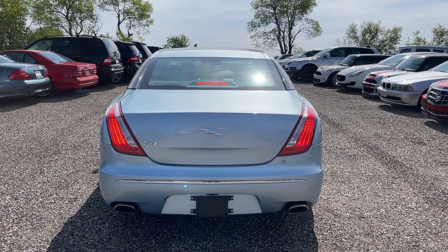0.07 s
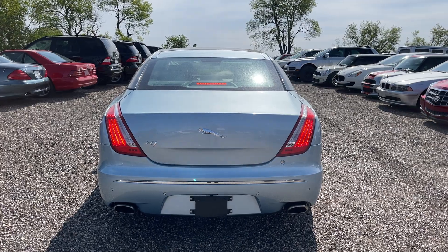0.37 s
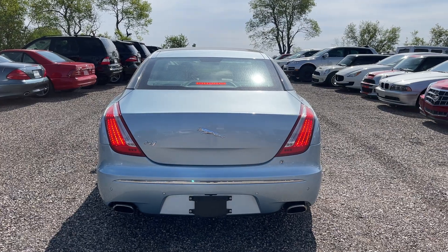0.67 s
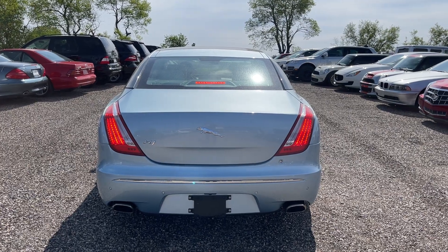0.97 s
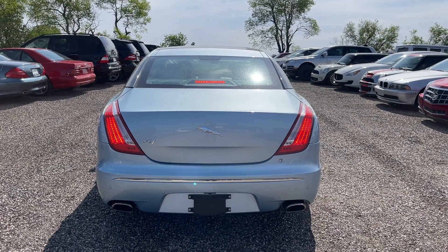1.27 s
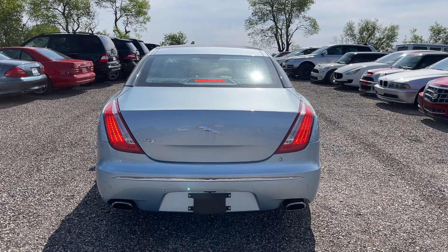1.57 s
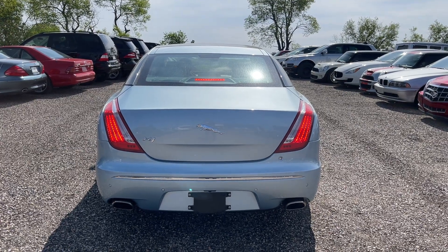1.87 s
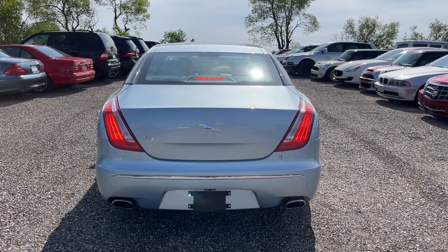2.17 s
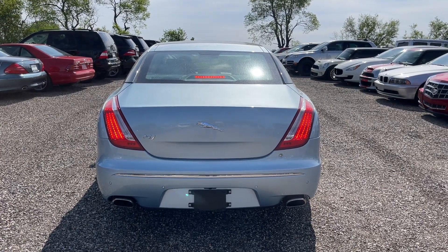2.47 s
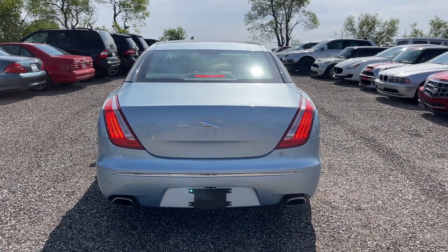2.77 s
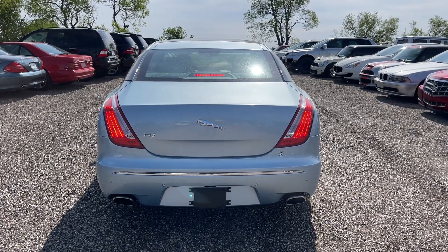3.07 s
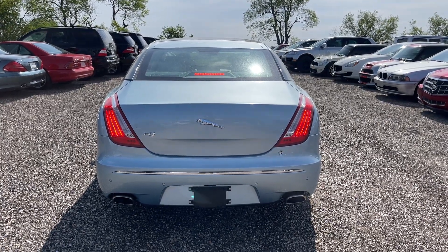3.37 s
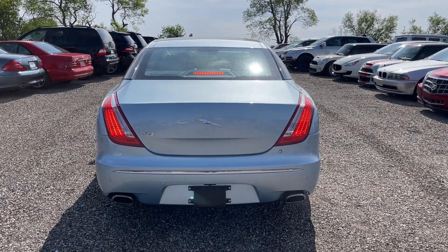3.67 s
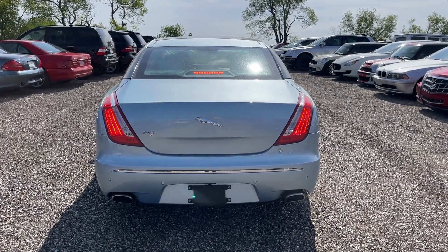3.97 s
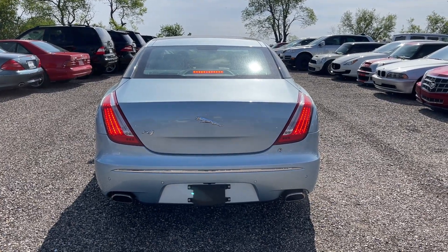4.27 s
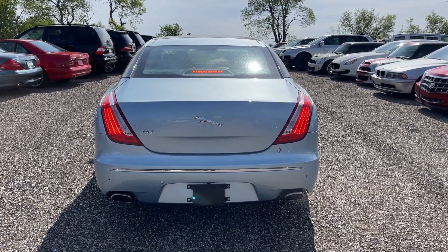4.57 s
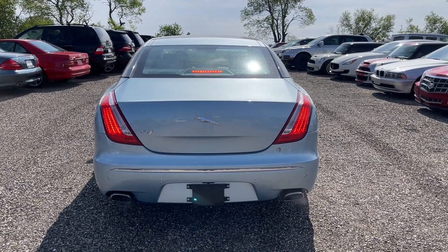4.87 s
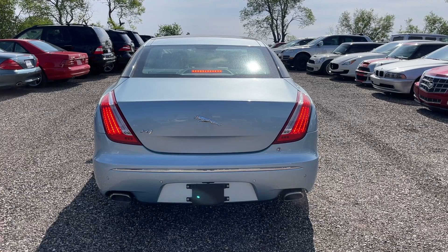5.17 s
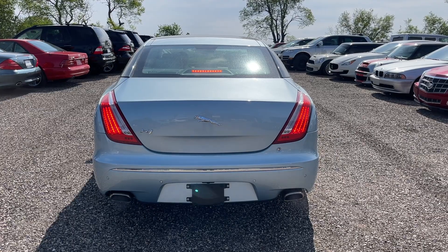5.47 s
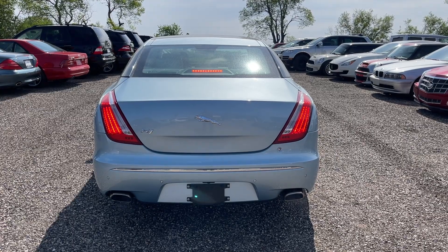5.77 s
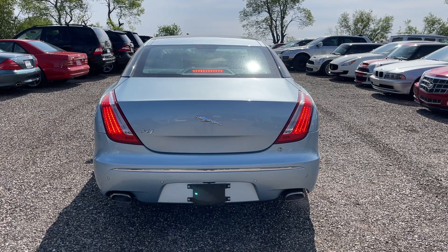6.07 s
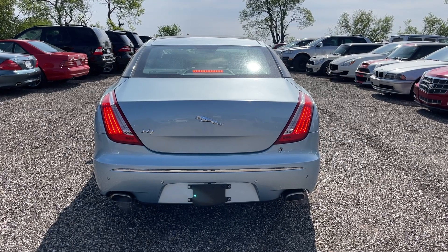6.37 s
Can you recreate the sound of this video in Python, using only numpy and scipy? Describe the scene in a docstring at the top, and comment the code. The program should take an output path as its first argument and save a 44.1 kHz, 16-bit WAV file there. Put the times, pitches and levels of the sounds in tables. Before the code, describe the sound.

Small birds whistle and trill above the low drone of a running engine and a faint traffic rumble in a parking lot. Heard from a few metres behind, a car's starter clacks in and cranks briefly. The V8 catches with sharp pops, thumps and a hiss, revs up, then eases down to a quick, throaty idle with faint ticks. Short echoes scatter off the parked cars.

```python
"""An engine drones and small birds sing on a gravel lot; then, a few metres away, a V8 saloon starts cold.
Heard from behind its tailpipes, the starter clacks in and cranks, the first charges bark and pop,
and the revs flare and settle to a fast, ticking idle. Two uneven banks pulse into the pipes to make
the burble, with a puff of gas at each firing. The rows of parked cars scatter the sound."""
import sys
import numpy as np
from scipy import signal
from scipy.fft import rfft, irfft, next_fast_len
from scipy.io import wavfile
from scipy.ndimage import uniform_filter1d

SR = 44100
rng = np.random.default_rng(int(sys.argv[2]) if len(sys.argv) > 2 else 0)


def generate_wav(signal):
    """Clip the signal to [-1, 1] and save it as 16-bit WAV at the path in sys.argv[1]."""
    frames = np.transpose(np.atleast_2d(signal))
    scaled = np.clip(frames, -1, 1) * 32767
    pcm = np.round(scaled).astype(np.int16)
    wavfile.write(sys.argv[1], SR, pcm)


N = 287091
T = np.arange(N) / SR
FIRES_S = 3.235  # the V8 catches

# tailpipe resonances: centre_hz, width_hz, lift_db
TAILPIPE = [(620, 27, 7.5), (1116, 53, 6.5), (2355, 50, 6), (3800, 80, 5), (4810, 110, 4)]
# bright colour of the hiss and the ticks: freq_hz, gain_db
HISS_EQ = [(1500, -7.5), (3000, 3.5), (3900, 1), (5000, -1), (6500, -5), (7500, -4), (9000, -1),
           (10200, -19), (11200, -6.5), (12500, -50)]


def engine(scatter_db=2):
    """Eight uneven cylinders fire in turn, driving the exhaust, the gas and the ringing metal."""
    # the revs flare, dip, recover and settle: time_s, firing_hz
    revs = [(3.24, 38.6), (3.5, 126.9), (3.72, 133.25), (4.1, 106.25), (4.48, 109.4), (5.05, 98.4),
            (5.9, 90.9), (6.5, 90.6)]
    # how hard the engine works, as the level of its burble: time_s, level_db
    effort = [(3.25, -28.5), (3.35, -28.5), (3.47, -26), (3.7, -34.5), (3.9, -36.5), (3.98, -43.5),
              (4.2, -37.5), (4.42, -30.5), (4.97, -30), (5.55, -32.5), (5.95, -36), (6.5, -32.5)]
    # strength of each cylinder, in firing order: gain_db
    cylinder_db = [-2.5, 0.95, 0, 1.5, -0.5, -0.24, 0.052, -2.6]
    rate, effort_db = curve(revs), curve(effort)
    running = np.clip((T - FIRES_S) / .02, 0, 1)
    phase = np.cumsum(rate * (running > 0)) / SR  # counts firings
    firing = phase.astype(int)
    charge_luck, tick_luck = rng.standard_normal((N // 100, 2))[firing].T
    strength = unit(undb(np.array(cylinder_db)[firing % 8] + scatter_db * charge_luck))
    pulses = bank_pulses(firing, strength * np.sqrt(SR / rate))
    puffs = unit(strength * (1 + 2 * np.exp(-3 * (phase % 1))))
    # gas and metal grow with effort and flutter once per engine cycle
    rush = undb(-40.5 + .35 * (effort_db + 30) + 1.5 * np.cos(2 * np.pi * phase / 8))
    metal = ringing_metal(pulses, rate, rush)
    exhaust = undb(effort_db) * (burble(pulses, puffs, rate) + silencer(phase, rate, strength))
    gas = rushing_gas(puffs, rate, rush)
    return running * (exhaust + metal + gas + ticking_hiss(phase, tick_luck))


def bank_pulses(firing, strength, lag_s=.00242):
    """One pressure pulse per firing; one bank has the longer pipe, so its pulses come late."""
    # the bank of each cylinder, in firing order: 0 short pipe, 1 long pipe
    bank = [0, 1, 1, 0, 1, 0, 0, 1]
    pulses = np.diff(firing, prepend=0) * strength
    late = pulses * np.array(bank)[firing % 8]
    return pulses - late + np.interp(T - lag_s, T, late)


def burble(pulses, puffs, rate, pulse_db=1, turbulence_db=-6.5):
    """Pulses and turbulence resonate in the pipe; uneven burning blurs the upper harmonics."""
    # cold charges burn less evenly as the revs sink: firing_hz, timing_spread_s
    burn_spread = [(95, .0005), (108, .00032)]
    # deep colour of the exhaust pipe: freq_hz, gain_db
    pipe_eq = [(35, -27.5), (60, 4), (105, 6), (150, 2), (180, 0), (220, 5), (285, -2.5), (325, -11),
               (410, -9.5), (520, -17), (620, -31.5), (720, -28.5), (1100, -25.5), (1600, -57)]
    # its standing waves: centre_hz, width_hz, lift_db
    standing_waves = [(149, 10, 5), (418, 23, 7)]
    jitter_s = np.interp(rate, *np.transpose(burn_spread)) * walk(90)
    blurred = undb(pulse_db) * np.interp(T + jitter_s, T, pulses)
    return colour(blurred + undb(turbulence_db) * noise() * puffs, pipe_eq, standing_waves)


def silencer(phase, rate, strength, resonance_hz=96.1, width_hz=24):
    """The firing tone booms at the silencer's resonance; its octave rings only at high revs."""
    boom = undb(-9) + undb(12) / (1 + (2 * (rate - resonance_hz) / width_hz) ** 4)
    tone = boom * undb(.8 * walk(20)) * np.sin(2 * np.pi * phase)
    octave = undb(-1 + 2 * walk(60)) * np.sin(4 * np.pi * phase + .36 * walk(70))
    high_revs = np.clip((rate - 98) / 7, 0, 1) * np.minimum(110 / rate, 1) ** 2
    return tone + strength * high_revs * octave


def rushing_gas(puffs, rate, rush, rasp_db=-48.5):
    """Gas puffs out of the tailpipes and rasps when it flows fast."""
    # hollow colour of the gas: freq_hz, gain_db
    gas_eq = [(90, -10.5), (230, -31.5), (340, 5.5), (580, 5.5), (700, -3.5), (815, 7), (950, -0.5),
              (1020, 4), (1270, -1), (1500, -9.5), (2000, -13), (2700, -14), (3200, -31), (5000, -50)]
    # colour of the rasp: freq_hz, gain_db
    rasp_eq = [(700, -7.5), (1400, 3.5), (2700, 3.5), (3300, -23), (6000, -42.5)]
    gas = colour(noise() * puffs, gas_eq, TAILPIPE) * undb(.5 + 1.4 * walk(13))
    rasp = colour(noise() * puffs, rasp_eq) * undb(rasp_db) * (rate / rate.max()) ** 3
    return rush * gas + rasp


def ringing_metal(pulses, rate, rush, swell_s=6.2, swell_db=-43):
    """Thin metal sings in sympathy when a harmonic of the firings passes one of its resonances."""
    # the metal's resonant bands: centre_hz, half_width_hz, gain_db
    modes = [(621, 19, -23), (1106, 18, -14), (1236, 43, -17.5)]
    low_revs = np.clip((120 - rate) / 12, 0, 1)
    drive = rush * low_revs * undb(2.8 * walk(24))
    metal = sum(undb(db) * band(pulses, hz, 2 * half_width) for hz, half_width, db in modes)
    # late in the idle the lowest ring swells
    lowest = np.sqrt(2) * np.sin(angle(modes[0][0] * (1 + .006 * walk(50))))
    return drive * metal + undb(swell_db) * np.exp(-((T - swell_s) / .12) ** 2) * lowest


def ticking_hiss(phase, tick_luck, idle_db=-56.5, surge_db=-50, surge_decay_s=.2):
    """Hiss surges as the engine fires, then relaxes; the fuel pump ticks on every second firing."""
    stroke = phase / 2
    cam_db = np.array([-4, -12.5, -3, -18])[stroke.astype(int) % 4] + 2 * tick_luck
    ticks = uniform_filter1d(2 * undb(cam_db) * np.exp(-(stroke % 1) / .38), SR // 250)
    hiss = colour(noise() * unit(np.hypot(1, ticks)), HISS_EQ, TAILPIPE)
    level = undb(idle_db) + undb(surge_db) * np.exp(-np.maximum(T - FIRES_S, 0) / surge_decay_s)
    return level * hiss * undb(.65 * walk(9.3))


def valve_ticks(decay_s=.0025):
    """A cold valve ticks out now and then."""
    # ticks: start_s, level_db
    ticks = [(4.766, -47), (4.955, -48), (5.085, -44), (5.407, -48), (5.5, -47), (5.622, -45)]
    return colour(noise() * bursts([(s, db, decay_s) for s, db in ticks], rise_s=.00025), HISS_EQ)


def barks(grit_db=3):
    """The first firings spit gritty noise through the cold pipes."""
    # spits: start_s, level_db, decay_s
    spits = [(3.237, -37, 0.017), (3.263, -40, 0.022), (3.283, -43, 0.007), (3.293, -32, 0.005),
             (3.301, -26.5, 0.005), (3.322, -39, 0.014), (3.338, -28.5, 0.0029), (3.363, -30, 0.0035),
             (3.376, -29, 0.0043), (3.402, -30, 0.0033), (3.42, -39, 0.003), (3.475, -35.5, 0.0049)]
    # their harsh colour: freq_hz, gain_db
    bark_eq = [(150, -14), (400, 1), (750, 3.5), (1350, 19), (1900, 3.5), (2800, 11.5), (3400, -4.5),
               (4800, 9.5), (7000, -1.5), (9300, 9.5), (10300, -8), (11300, 8.5), (12700, -12)]
    return colour(noise() * bursts(spits, rise_s=.0069) * undb(grit_db * walk(600)), bark_eq)


def pipe_pops(slap_db=21, puff_db=-3, decay_s=.0074):
    """Single charges pop as the engine catches, each a pressure pulse and a puff."""
    # charges: start_s, level_db
    charges = [(3.247, -35.5), (3.262, -35), (3.272, -30.5), (3.289, -28.5), (3.297, -29), (3.332, -26),
               (3.366, -30), (3.386, -27.5), (3.414, -28), (3.428, -26), (3.445, -32), (3.468, -24.5),
               (3.483, -27.5), (3.511, -36)]
    # boxy colour of a pop: freq_hz, gain_db
    pop_eq = [(150, 4), (250, 22), (350, 4), (480, 6), (650, 2.5), (850, 10.5), (1050, -4), (1400, -5.5),
              (1800, -13), (4000, -29.5)]
    pops = noise() * bursts([(s, db + puff_db, decay_s) for s, db in charges], rise_s=.0013)
    for s, db in charges:
        pops[int(s * SR)] += undb(db + slap_db)
    return colour(pops, pop_eq)


def exhaust_knocks(clank_decay_s=.0087, overtone_db=-8):
    """The fullest charges thump in the silencer and the hardest blows clank the exhaust."""
    # thumps: start_s, pitch_hz, level_db, decay_s
    thumps = [(3.288, 67.5, -3, 0.0078), (3.304, 54, -17, 0.053), (3.433, 95, -11, 0.0081)]
    # clanks: start_s, pitch_hz, level_db
    clanks = [(3.242, 1260, -31), (3.269, 1320, -39), (3.286, 1280, -35), (3.303, 1310, -31),
              (3.389, 1260, -28.5), (3.413, 1280, -30), (3.464, 1200, -32), (3.476, 1374, -30)]
    out = sum(struck(*thump, rise_s=.0014) for thump in thumps)
    for s, hz, db in clanks:
        out += struck(s, hz, db, clank_decay_s, rise_s=.0012)
        out += struck(s, 1.13 * hz, db + overtone_db, clank_decay_s, rise_s=.00078)
    return out


def starter(whine_db=-49, grind_db=-50, whistle_db=-81):
    """The starter's gears grind and whine, slowing at each compression."""
    # it spins up, then labours: time_s, pitch_hz
    cranking = [(2.63, 480.6), (2.7, 621), (2.75, 744), (2.82, 860), (2.89, 750), (2.95, 609), (3.02, 910),
                (3.06, 779), (3.12, 631), (3.18, 916), (3.24, 788)]
    # colour of the grinding: freq_hz, gain_db
    grind_eq = [(150, -3.5), (400, 5), (650, -3), (1200, -1.5), (1700, -15), (2400, -10), (3300, -19),
                (6500, -25), (9000, -24.5), (12000, -60)]
    # resonances of the housing: centre_hz, width_hz, lift_db
    housing = [(626, 40, 9.5), (1226, 90, 6.5)]
    hz = curve(cranking)
    turning = np.clip((T - 2.635) / .035, 0, 1) * np.clip((3.42 - T) / .22, 0, 1)
    phase = angle(hz * (1 + .045 * walk(300)))
    whine = unit(np.sin(phase) * undb(2.2 * walk(160)))
    grind = colour(noise() * undb(2.1 * walk(90)), grind_eq, housing)
    whistle = band(noise(), hz=11120, width_hz=300) * undb(2.5 * walk(14)) * (hz / 780) ** 3
    return turning * (undb(whine_db) * whine + undb(grind_db) * grind + undb(whistle_db) * whistle)


def pinion(ring_db=-48):
    """The starter's pinion clacks into mesh and leaves a thin, high ring."""
    # impacts: start_s, level_db, decay_s
    impacts = [(2.615, -50, .012), (2.625, -44, 0.025), (2.6465, -32, 0.0072), (2.657, -39, 0.015),
               (2.7, -49, 0.0072)]
    # their metallic colour: freq_hz, gain_db
    clack_eq = [(200, -4), (600, 5), (950, 3), (1220, 15.5), (1500, 2), (1900, 8.5), (2500, 0),
                (3500, -5.5), (6000, -8), (8000, -7.5), (10000, -13), (12500, -29)]
    clack = colour(noise() * bursts(impacts, rise_s=.0023) * undb(2 * walk(570)), clack_eq)
    ring = band(noise(), hz=11280, width_hz=550) * bursts([(2.648, ring_db, .025)], rise_s=.008)
    return clack + ring


def birds(twitter_db=-88.5, echo_db=-13, echo_decay_s=.07):
    """Whistles, slurs, a trill and a blur of far twittering, with a faint echo from the trees."""
    # stray whistles: start_s, length_s, from_hz, to_hz, level_db
    whistles = [(1.251, 0.055, 2970, 3010, -66.5), (1.547, 0.065, 2950, 3030, -64),
                (1.813, 0.066, 3060, 3000, -60.5), (1.963, 0.13, 6470, 6600, -70),
                (1.972, 0.14, 7020, 6930, -77.5), (2.151, 0.038, 5050, 4960, -59),
                (2.744, 0.11, 5380, 3800, -59), (2.825, 0.1, 3740, 3450, -66),
                (3.771, 0.034, 4300, 4170, -57)]
    # one bird repeats a falling slur: start_s, length_s, from_hz, level_db
    slurs = [(1.105, .05, 5300, -68), (1.295, .06, 5050, -66), (1.495, .056, 4950, -63),
             (1.671, .058, 5100, -62.5), (1.848, .056, 5000, -61), (2.016, .06, 5200, -62),
             (2.193, .052, 4900, -63), (2.364, .054, 5050, -64), (2.535, .05, 4850, -68)]
    song = sum(undb(db) * chirp(*note, bend=.81) for *note, db in whistles)
    song += sum(undb(db) * chirp(*note, to_hz=3060, bend=.58) for *note, db in slurs)
    song = (song + trill()) * undb(2.2 * walk(200))
    twitter = band(noise(), hz=6200, width_hz=1100) * undb(3 * walk(29))
    song += undb(twitter_db) * unit(twitter)
    trees = rng.standard_normal(SR // 2) * np.exp(-T[:SR // 2] / echo_decay_s)
    return song + undb(echo_db) * signal.fftconvolve(song, trees / np.linalg.norm(trees))[:N]


def trill(start_s=2.44, step_s=.0841, level_db=-54, fade_db_per_s=6, flick_db=-9):
    """A bird trills evenly and fades; each syllable is a held note and a falling flick."""
    out = np.zeros(N)
    for age in step_s * np.arange(8):
        detune = 1 + .0075 * rng.standard_normal()
        held = chirp(start_s + age, .038, detune * 4150, detune * 4040, bend=.76)
        flick = chirp(start_s + age + .03, .033, detune * 5750, 3400, bend=-.9)
        out += undb(level_db - fade_db_per_s * age) * (held + undb(flick_db) * flick)
    return out


def chirp(start_s, length_s, from_hz, to_hz, bend):
    """One whistled glide; a positive bend moves early, a negative one late."""
    out = np.zeros(N)
    u = np.linspace(0, 1, int(length_s * SR))
    hz = from_hz + (to_hz - from_hz) * (u + bend * u * (1 - u))
    first = int(start_s * SR)
    out[first:first + len(u)] = np.sqrt(2) * np.sin(np.pi * u) * np.sin(angle(hz))
    return out


def other_engine(trim_db=.92):
    """A nearby engine gives a round drone at its firing rate."""
    # it slowly settles: time_s, firing_hz
    revs = [(0, 78.44), (1.5, 78.53), (3.2, 77.35), (4.5, 75.81), (6.5, 73.05)]
    # the drone wavers: time_s, level_db
    levels = [(0.1, -27), (.9, -24.5), (1.85, -28), (2.2, -33.5), (2.7, -25.5), (3.2, -22.5), (4.3, -25),
              (4.65, -20.5), (5.3, -24), (6.25, -19), (6.5, -31.5)]
    level = undb(curve(levels) + trim_db + 1.4 * walk(21.95))
    return np.sqrt(2) * level * np.sin(angle(curve(revs)))


def hum(level_db=-49, swell_s=2.25):
    """A faint, wavering two-note hum swells just before the start."""
    swell = .35 + np.exp(-((T - swell_s) / .3) ** 2)
    waver = angle(1 + .0098 * walk(30))
    return undb(level_db) * swell * (np.sin(287 * waver) + .5 * np.sin(390 * waver))


def traffic():
    """Distant traffic blends into a low rumble."""
    # its dark colour: freq_hz, gain_db
    rumble_eq = [(25, -7.5), (45, 24), (70, 21), (105, 24), (160, 14), (190, 9.5), (330, 1.5), (600, -3),
                 (1000, -1.5), (1400, -5), (2100, -7), (3200, -20.5), (6500, -39.5), (9000, -51)]
    # it swells a little: time_s, level_db
    levels = [(.8, -39), (2.3, -36)]
    return colour(noise(), rumble_eq, peaks=[(603, 150, 7.4)]) * undb(curve(levels) + .5 * walk(4.2))


def gravel():
    """Shoes shift on the gravel with a small crunch."""
    # scuffs: start_s, level_db, decay_s
    scuffs = [(.105, -58, 0.036), (.24, -50, 0.032), (.44, -59, 0.03)]
    grit = noise() * bursts(scuffs, rise_s=.015) * undb(4 * walk(400))
    return colour(grit, eq=[(700, -4), (2300, 12), (3500, -7.5), (5000, -9.5), (8000, -30.5)])


def scatter(x, decay_s, side_db):
    """Ground and parked cars send back a short spray of echoes that differs between left and right."""
    # stereo width, side against mid: freq_hz, gain_db
    width = [(60, -34.5), (110, -17), (200, -18.5), (350, -8), (630, -0.5), (1150, -2), (2100, -6.5),
             (3700, -3), (6700, -6), (11000, 5)]
    size = SR // 8
    spray = rfft(rng.standard_normal(size) * np.exp(-T[:size] / decay_s))
    f = np.arange(len(spray)) * SR / size
    spray[f < 130] = 1j  # keeps the bass equally loud on both sides
    hz, db = np.transpose(width)
    gain = undb(side_db + np.interp(np.log(1 + f), np.log(hz), db))
    lead = size // 4
    response = np.roll(irfft(gain * spray / np.abs(spray)), lead)
    side = signal.fftconvolve(x, response)[lead:lead + N]
    return np.array([x + side, x - side])


def undb(db):
    """Decibels to gain."""
    return 10 ** (np.asarray(db) / 20)


def unit(x):
    """Scale to rms 1."""
    return x / np.sqrt(np.mean(x ** 2))


def noise():
    """White noise, rms 1."""
    return rng.standard_normal(N)


def curve(points):
    """Join (time_s, value) points with straight lines."""
    return np.interp(T, *np.transpose(points))


def angle(hz):
    """Running phase of a moving pitch, in radians."""
    return 2 * np.pi * np.cumsum(hz) / SR


def walk(rate_hz):
    """A smooth random wobble, rms 1: held levels, slewed twice."""
    hold = int(SR / rate_hz)
    steps = np.repeat(rng.standard_normal(N // hold + 1), hold)
    return unit(uniform_filter1d(uniform_filter1d(steps, hold), hold)[:N])


def colour(x, eq, peaks=()):
    """Causal EQ of unit power gain: (freq_hz, gain_db) points, (centre_hz, width_hz, lift_db) peaks."""
    size = 2 * next_fast_len(N // 2 + SR // 4)
    f = np.arange(size // 2 + 1) * SR / size
    hz, db = np.transpose(eq)
    gain_db = np.interp(np.log(f + 1), np.log(hz), db)
    gain_db -= 12 * np.log2(np.maximum(hz[0] / (f + 1), 1))  # roll off below the first point
    for centre, width, lift in peaks:
        gain_db += lift / (1 + (2 * (f - centre) / width) ** 2)
    # minimum phase keeps the attacks sharp
    cepstrum = irfft(np.log(unit(undb(gain_db))))
    cepstrum[1:size // 2] *= 2
    cepstrum[size // 2 + 1:] = 0
    return irfft(rfft(x, size) * np.exp(rfft(cepstrum)))[:N]


def band(x, hz, width_hz):
    """Two passes through one resonance, rms 1."""
    b, a = signal.iirpeak(hz, hz / width_hz, fs=SR)
    return unit(signal.lfilter(b, a, signal.lfilter(b, a, x)))


def bursts(blows, rise_s):
    """Envelope of blows (start_s, level_db, decay_s) that rise quickly and die away."""
    out = 0
    for s, db, decay_s in blows:
        age = np.maximum(T - s, 0)
        out = out + undb(db) * (1 - np.exp(-age / rise_s)) * np.exp(-age / decay_s)
    return out


def struck(start_s, hz, db, decay_s, rise_s):
    """One mode, set ringing by a blow."""
    return bursts([(start_s, db, decay_s)], rise_s) * np.sin(2 * np.pi * hz * (T - start_s))


def scene(bird_pan_db=5.5):
    """The car ahead, birds to the left, the lot all around."""
    car = engine() + valve_ticks() + barks() + pipe_pops() + exhaust_knocks() + starter() + pinion()
    song = birds() * undb([[bird_pan_db], [-bird_pan_db]])
    ahead = scatter(car, decay_s=.0058, side_db=-2.5)
    lot = other_engine() + hum() + traffic() + gravel()
    return ahead + song + scatter(lot, decay_s=.023, side_db=3)


def record(dry, low_hz=28, top_hz=12700):
    """The deepest rumble and the highest treble are filtered away."""
    x = signal.sosfilt(signal.butter(2, low_hz, "high", fs=SR, output="sos"), dry)
    return signal.sosfilt(signal.ellip(8, .2, 70, top_hz, fs=SR, output="sos"), x)


dry = scene()
out = record(dry)
generate_wav(out)
```